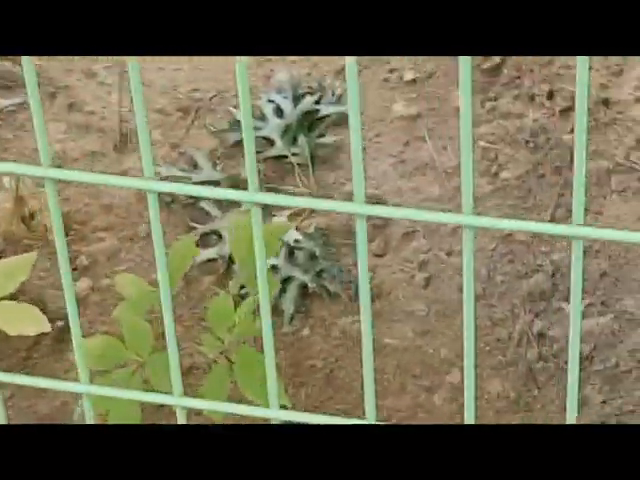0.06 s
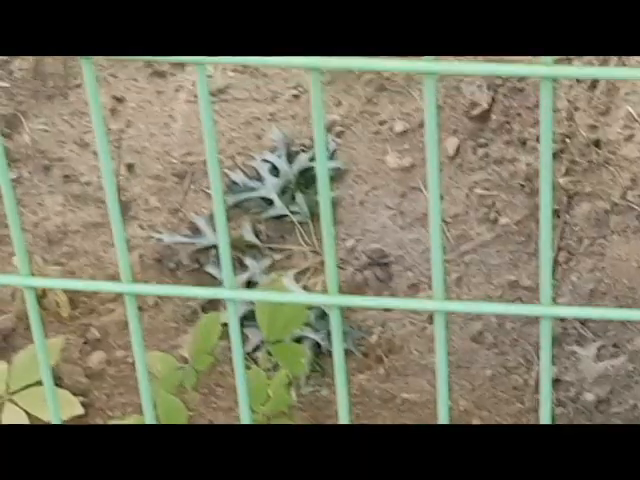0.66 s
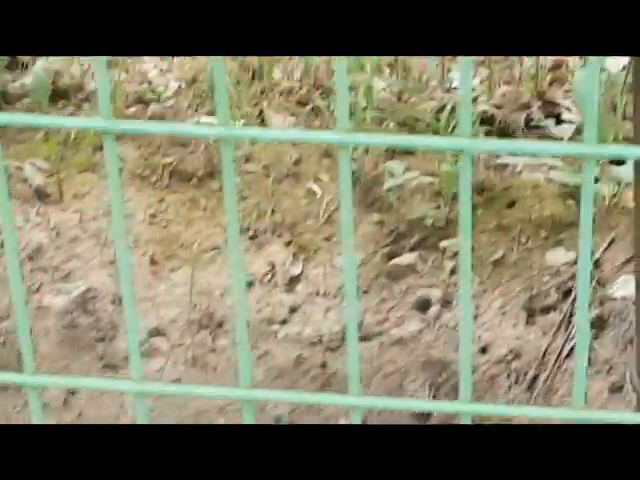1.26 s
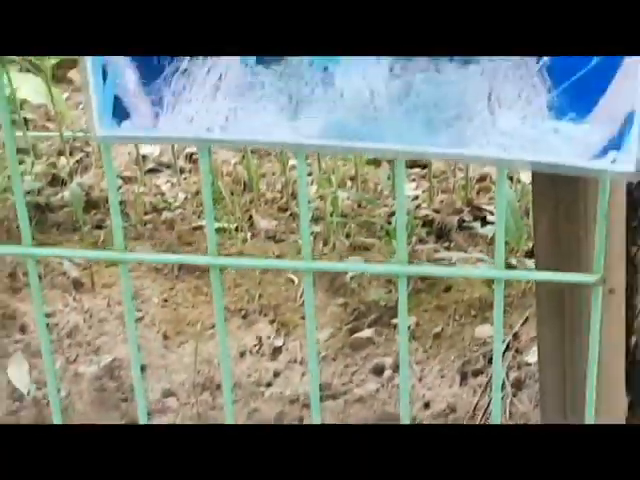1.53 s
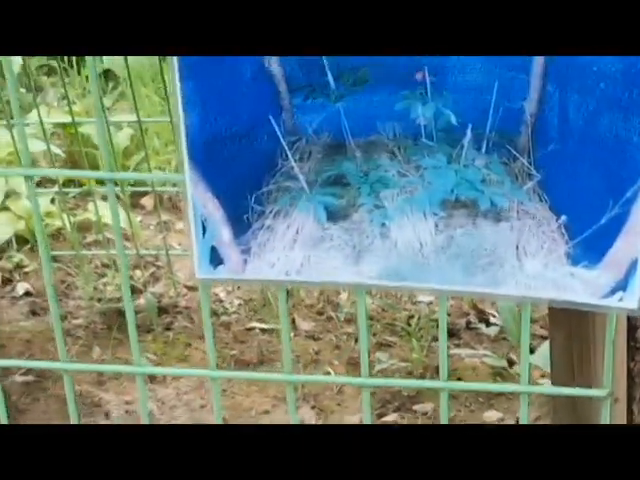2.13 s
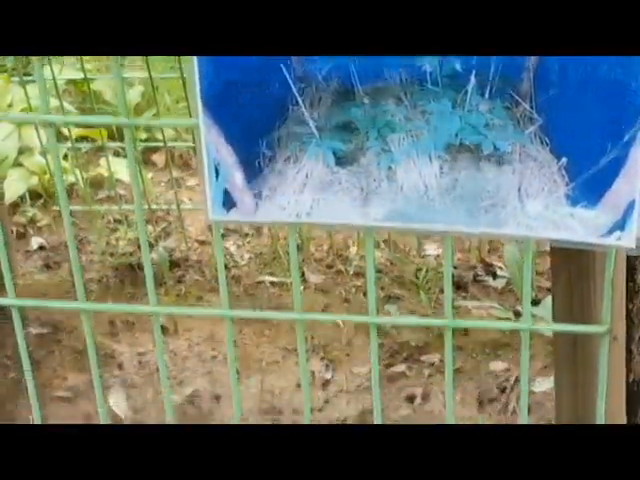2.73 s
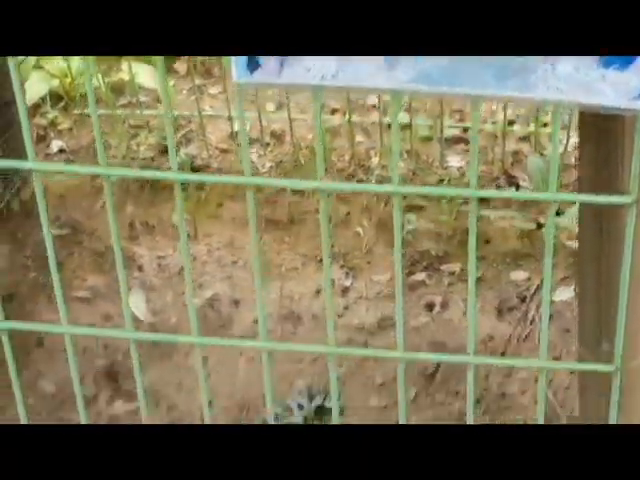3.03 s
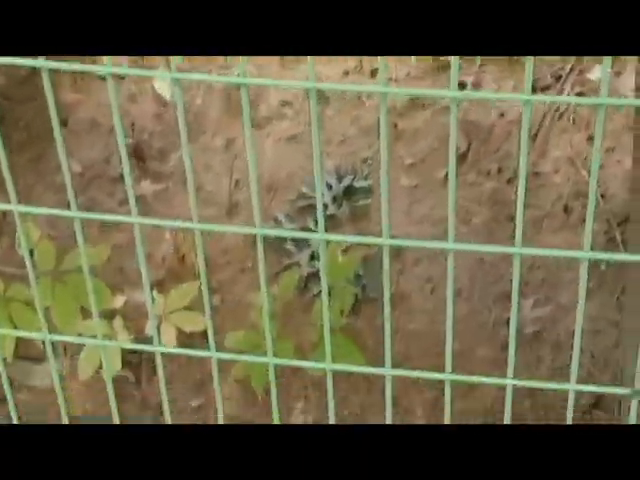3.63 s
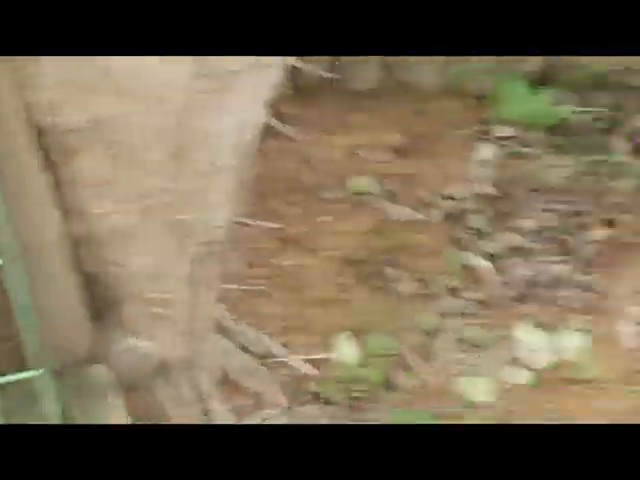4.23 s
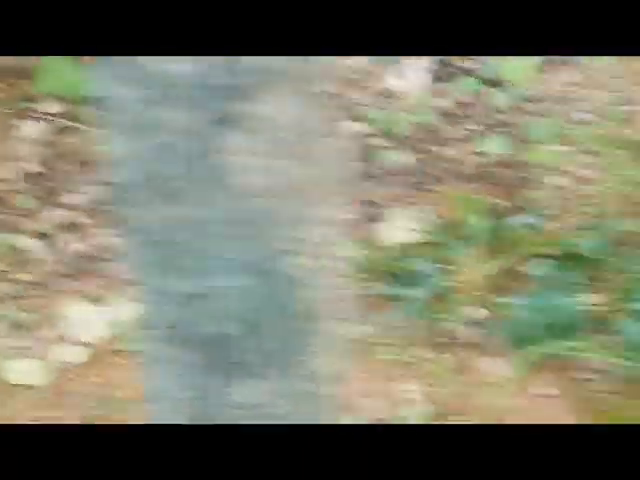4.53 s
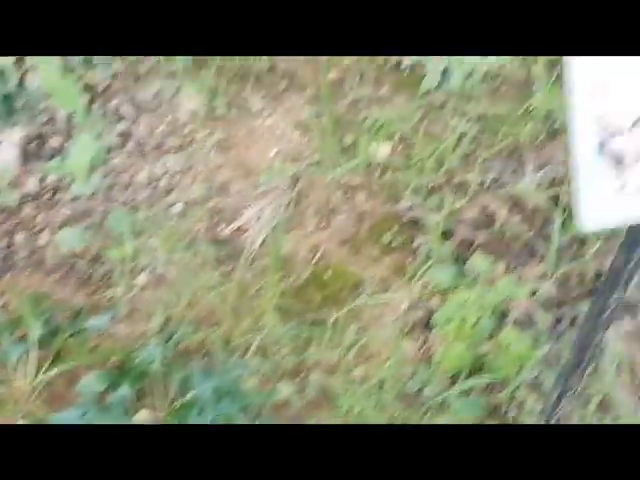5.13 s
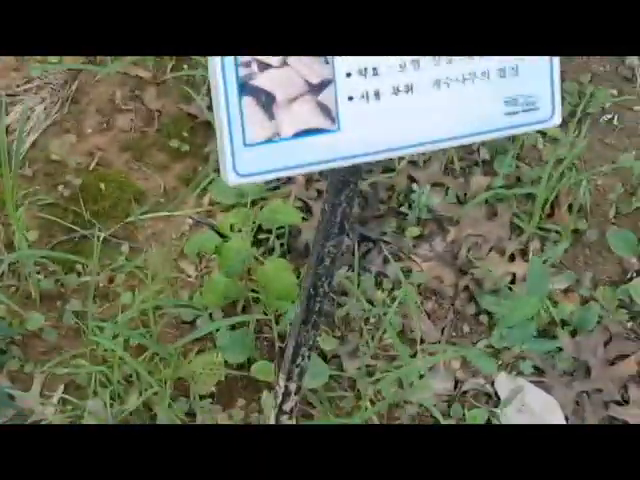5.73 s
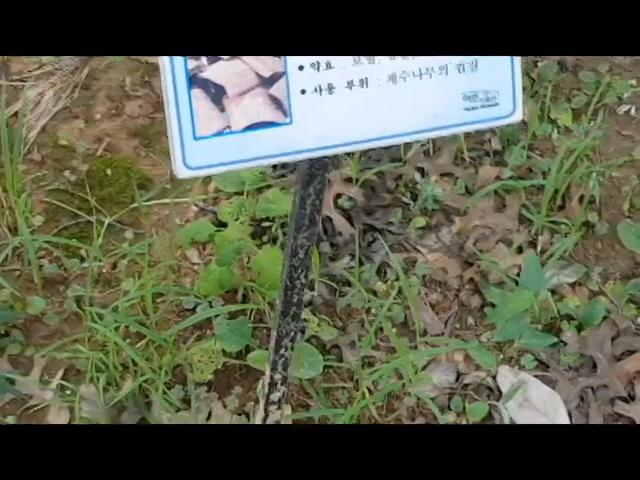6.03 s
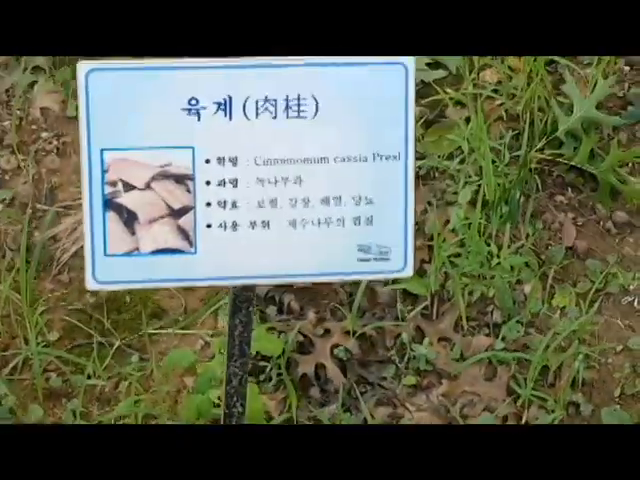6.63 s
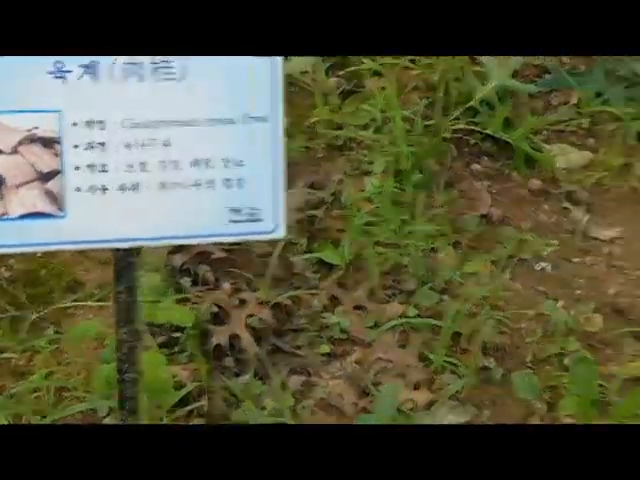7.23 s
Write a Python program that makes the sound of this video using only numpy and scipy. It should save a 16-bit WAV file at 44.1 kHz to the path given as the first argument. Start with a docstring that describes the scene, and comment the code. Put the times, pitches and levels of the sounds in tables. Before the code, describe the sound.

A high, unbroken cicada chorus sizzles outdoors, pulsing about twice a second, with a faint town rumble and machine hum underneath.

```python
"""Cicadas in the trees round a summer garden, each clicking a pair of buckling drums (tymbals).
A far chorus merges into a sizzle through the leaves. Two near singers, one after the other, alternate
a very high rasp (abdomen tight) with a lower ringing note (abdomen stretched), about twice a second.
Under them: town rumble, a faint wavering machine hum, a few soft steps and scuffs on soil.
The hand-held microphone turns away after four seconds."""
import sys
import numpy as np
from scipy import signal
from scipy.fft import rfft, irfft
from scipy.io import wavfile
from scipy.ndimage import uniform_filter1d, map_coordinates

SR = 44100
rng = np.random.default_rng(int(sys.argv[2]) if len(sys.argv) > 2 else 0)


def materialize(psi):
    """Save the field psi as 16-bit PCM at rate SR to the path in sys.argv[1].

    A 1-D psi becomes a single channel; in a 2-D psi each row is a channel.
    """
    bounded = np.clip(np.atleast_2d(psi).T, -1, 1)
    quanta = np.round(bounded * 32767).astype(np.int16)
    wavfile.write(sys.argv[1], SR, quanta)


N = 325017
T = np.arange(N) / SR
BINS_HZ = np.maximum(np.arange(N // 2 + 1) * SR / N, 1)


def undb(db):
    """Decibels to gain."""
    return 10 ** (np.asarray(db) / 20)


def curve(rows, column=1):
    """Table column, interpolated over time."""
    rows = np.array(rows)
    return np.interp(T, rows[:, 0], rows[:, column])


def bell(t_s, sigma_s):
    """Gaussian envelope, peak 1 at t_s."""
    return np.exp(-0.5 * ((T - t_s) / sigma_s) ** 2)


def spectrum(points):
    """Table values, interpolated over log frequency."""
    hz, value = np.transpose(points)
    return np.interp(np.log(BINS_HZ), np.log(hz), value)


def filtered(x, gain):
    """Apply a gain per frequency."""
    return irfft(rfft(x) * gain, N)


def noise(gain, shape=N):
    """White noise shaped by a gain per frequency."""
    return filtered(rng.standard_normal(shape), gain)


def resonance(hz, stage_width_hz):
    """Two equal band-pass stages, for steep skirts."""
    return (1 + 1j * (BINS_HZ ** 2 - hz ** 2) / (BINS_HZ * stage_width_hz)) ** -2


def pan(side_db):
    """Stereo gains for a left-minus-right level."""
    return undb(np.array([[0.5], [-0.5]]) * side_db)


def unit(x):
    """Scale to rms 1 in the channel mean."""
    return x / np.std(x.mean(axis=0))


def wander(cutoff_hz):
    """Smooth random drift, rms 1."""
    drift = noise(1 / (1 + (BINS_HZ / cutoff_hz) ** 4))
    return drift / drift.std()


def delayed(x, delay_s):
    """Moving delay on one channel."""
    return map_coordinates(x, [np.arange(N) - delay_s * SR], order=5, mode="nearest")


def tymbals(rate_hz, jitter_cycles, scatter_db, partner_gain=0.94, lag_cycles=0.5):
    """Two drums buckle in turn, each once a cycle; every click has its own size and timing."""
    phase_cycles = np.cumsum(rate_hz) / SR
    cycle = np.arange(int(phase_cycles[-1]))[:, None]
    click_cycles = cycle + np.array([0, lag_cycles])
    click_cycles += jitter_cycles * rng.standard_normal(click_cycles.shape)
    size = np.array([1, partner_gain]) * undb(scatter_db * rng.standard_normal(click_cycles.shape))
    at_sample = np.interp(click_cycles.ravel(), phase_cycles, np.arange(N))[:, None]
    taps = np.floor(at_sample).astype(int) + np.arange(-5, 7)
    offset = taps - at_sample
    clicks = size.reshape(-1, 1) * np.sinc(offset) * np.sinc(offset / 7)  # band-limited impulses
    return np.bincount(taps.ravel() % N, clicks.ravel(), N)


def foliage(x, t60_s, direct_gain, hop=6000):
    """Leaves scatter sound differently to each side; the moving microphone meets new paths each hop."""
    span = 2 * hop
    decay = undb(-60 * T[:span] / t60_s)
    window = np.sin(np.pi * np.arange(span) / span)
    padded = np.pad(x, (hop, span), mode="reflect")
    out = np.zeros((2, N + 5 * hop))
    for start in range(0, N + hop, hop):
        echoes = rng.standard_normal((2, span)) * decay
        echoes /= np.linalg.norm(echoes, axis=1, keepdims=True)
        scattered = signal.fftconvolve([window * padded[start:start + span]], echoes, axes=1)
        out[:, start:start + scattered.shape[1]] += scattered
    return direct_gain * x + out[:, hop:hop + N]


def far_cicadas(count=9):
    """Tymbal pairs, each drifting in rate and level on its own."""
    out = 0
    for rate_hz in np.geomspace(120, 270, count):
        clicks = tymbals(rate_hz * (1 + 0.025 * wander(3)), jitter_cycles=0.01787, scatter_db=3.0)
        out += clicks / clicks.std() * undb(0.87 * wander(27))
    return out


# Chorus spectra, lower body and bright top: f/Hz, relative density/dB
BODY_SPECTRUM_DB = [(1500, -43.5), (2200, -20), (2800, -10), (3200, -6.5), (3550, -2.5), (3950, -1.3),
                    (4300, -2.5), (4900, -1), (5500, -10.5), (6500, -19), (9000, -54)]
BRIGHT_SPECTRUM_DB = [(3500, -29.5), (5000, -16), (5700, -3), (6200, -1), (6900, -2.5), (7500, -5.5),
                      (8500, -10), (10000, -14.5), (11500, -13), (13500, -8), (16000, -8.5)]
# Envelopes of the two bands: t/s, relative level/dB
BODY_LEVEL_DB = [(0, -29), (1.2, -29), (2.4, -29), (3.7, -28.5), (4.3, -31), (5.1, -30), (6, -31),
                 (7.37, -29.5)]
BRIGHT_LEVEL_DB = [(0.0, -28.5), (3.47, -28.5), (4.93, -30), (5.17, -32), (7.2, -33.5)]
# Balance, trees to the left: f/Hz, left minus right/dB
CHORUS_SIDE_DB = [(2000, 6.5), (3000, 3), (3700, 7), (4600, 2), (5500, 6.5), (6800, 10), (8000, 7.5),
                  (10000, 3), (14000, -0.5)]

def chorus():
    """Two groups of trees full of cicadas, heard almost only through the leaves."""
    sizzle = foliage(far_cicadas(), t60_s=0.2, direct_gain=0.078)
    sizzle += foliage(far_cicadas(), t60_s=0.16, direct_gain=0.1)
    side = pan(spectrum(CHORUS_SIDE_DB))
    body = unit(filtered(sizzle, side * undb(spectrum(BODY_SPECTRUM_DB))))
    body *= undb(curve(BODY_LEVEL_DB) + 0.32 * wander(23))
    bright = unit(filtered(sizzle, side * undb(spectrum(BRIGHT_SPECTRUM_DB))))
    bright *= undb(curve(BRIGHT_LEVEL_DB) + 0.7 + 0.12 * wander(25))
    return body + bright


def rasp(levels_db, rates_hz, spectrum_db, gain_db, side_db, jitter_cycles, direct_gain):
    """Near cicada, abdomen tight: only the stiff tymbal ribs ring, very high."""
    rate_hz = curve(rates_hz) * (1 + 0.0015 * wander(8))
    clicks = tymbals(rate_hz, jitter_cycles, scatter_db=2.5, partner_gain=0.71, lag_cycles=0.485)
    rib_decay_s = 0.00049  # each buckling runs across several ribs
    bursts = signal.lfilter([1], [1, -np.exp(-1 / (rib_decay_s * SR))], np.abs(clicks))
    ribs = bursts * rng.standard_normal(N)
    voice = clicks / clicks.std() + 0.76 * ribs / ribs.std()
    scattered = foliage(voice, t60_s=0.3, direct_gain=direct_gain)
    heard = unit(filtered(scattered, undb(spectrum(spectrum_db)) * pan(side_db)))
    singing = (T >= levels_db[0][0]) & (T <= levels_db[-1][0] + 0.01)
    gate = uniform_filter1d(singing.astype(float), SR // 10)
    return heard * gate * undb(curve(levels_db) + rasp_dips_db() + gain_db)


# Rasp envelopes, louder as the microphone faces the singer: t/s, relative level/dB
FIRST_LEVEL_DB = [(0, -30), (.6, -32.5), (1.5, -32), (2.0, -30.5), (2.4, -31), (2.9, -29), (3.35, -31.5),
                  (4.0, -31)]
SECOND_LEVEL_DB = [(4.0, -31), (4.3, -42), (4.92, -42), (5.25, -31.5), (5.7, -30), (6.1, -27.8),
                   (6.55, -25.5), (7.0, -26.3), (7.37, -26)]
# Buckling rate of each tymbal: t/s, rate/Hz
FIRST_RATE_HZ = [(0, 154), (.6, 146), (1.5, 160), (2.5, 161), (3.4, 180), (4.2, 155)]
SECOND_RATE_HZ = [(4.1, 186), (5.2, 188.4), (6.1, 185.7), (6.5, 186.6), (7.37, 187.5)]
# Rib spectra: f/Hz, relative density/dB
FIRST_SPECTRUM_DB = [(7000, -49), (10500, -15.5), (12000, -6), (13000, 0), (14000, 1.5), (15800, -1.5)]
SECOND_SPECTRUM_DB = [(7000, -28), (10500, -24), (12000, -13), (13000, -1), (13900, 2.5), (15000, 2),
                      (15800, 0.5)]

def near_rasps():
    """Two near cicadas; the second takes over at 4 s."""
    first = rasp(FIRST_LEVEL_DB, FIRST_RATE_HZ, FIRST_SPECTRUM_DB,
                 gain_db=3.0, side_db=2.0, jitter_cycles=0.0128, direct_gain=0.26)
    second = rasp(SECOND_LEVEL_DB, SECOND_RATE_HZ, SECOND_SPECTRUM_DB,
                  gain_db=0.9, side_db=5.0, jitter_cycles=0.0026, direct_gain=0.25)
    return first + second


# Traffic spectrum: f/Hz, relative density/dB
TOWN_SPECTRUM_DB = [(20, -20), (35, -10), (52, -2), (90, -6.5), (240, -2), (320, -3), (460, -9), (640, -8),
                    (900, -10.5), (1350, -9), (1900, -15.5), (3000, -38), (8000, -38)]
# Likeness of left and right: f/Hz, coherence/0-1
TOWN_COHERENCE = [(30, 1), (130, 0.94), (300, 0.97), (600, 0.92), (1100, 0.19), (2000, 0.22)]
# Balance of traffic and hum: f/Hz, left minus right/dB
TOWN_SIDE_DB = [(40, -1.5), (250, 0.1), (600, 0.5), (1200, 4), (2500, 5)]
# Traffic envelope: t/s, level/dB
TOWN_LEVEL_DB = [(0, -39.5), (2.5, -38.5), (4.2, -39.5), (5.5, -40), (7.37, -38.5)]
# Microphone pose: t/s, ground bounce delay/s, left port lag/s
POSE_DELAYS_S = [(0, 0.001, .00033), (2.5, 0.0012, .00032), (3.3, 0.00095, .00034), (3.9, 0.00081, .00034),
                 (4.5, 0.00089, -.00003), (5.2, 0.0013, -.00004), (7.37, .0012, 0)]

def town():
    """Far traffic: bass alike on both sides; the ground bounce hollows out the low middle."""
    coherence = np.clip(spectrum(TOWN_COHERENCE), 0, 1)
    mid = noise(np.sqrt(1 + coherence))
    side = noise(np.sqrt(1 - coherence))
    colour = undb(spectrum(TOWN_SPECTRUM_DB)) * pan(spectrum(TOWN_SIDE_DB))
    direct = filtered(np.array([mid + side, mid - side]), colour)
    reflected = filtered(direct, 0.46 / (1 + (BINS_HZ / 900) ** 2))
    bounce = np.array([delayed(channel, curve(POSE_DELAYS_S)) for channel in reflected])
    return unit(direct + bounce) * undb(curve(TOWN_LEVEL_DB) + 0.25 * wander(1.0))


def port_lag(background):
    """Above the all-round bass, sound reaches the left port late until the microphone turns."""
    left, right = background
    bass = filtered(left, 1 / (1 + (BINS_HZ / 420) ** 4))
    upper = delayed(left - bass, curve(POSE_DELAYS_S, column=2))
    return np.array([bass + upper, right])


# Machine tones: f/Hz, half-power width/Hz, level/dB
HUM_TONES = [(112.8, 7.8, -50.5), (172.2, 7.8, -54.5), (231.5, 7.7, -50), (703, 12, -51.5),
             (1395, 29, -55.5)]

def machine_hum():
    """Narrow tones of a far machine, wavering as the air carries them."""
    side = pan(spectrum(TOWN_SIDE_DB))
    return sum(unit(noise(resonance(hz, 1.57 * width_hz) * side)) * undb(level_db)
               for hz, width_hz, level_db in HUM_TONES)


def tilt_gain_db(hz, tilt_db, pivot_hz=4430):
    """Positive tilt favours resonances above the pivot, negative those below."""
    return tilt_db * np.tanh(4 * np.log2(hz / pivot_hz))


# Notes between rasps: t/s, sigma/s, relative level/dB, click rate of the pair/Hz, rasp dip/dB, tilt/dB
NOTE_EVENTS = [(.35, 0.058, -29, 378.3, 1, 4), (.48, 0.055, -29, 399, 0, -7),
               (.67, 0.1, -26.5, 395.4, 6, -2), (1.1, 0.13, -29.5, 384, 0, -6),
               (1.65, .08, -26.5, 394.6, 1, -5), (2.14, 0.085, -24, 391, 5, -5),
               (2.6, 0.078, -24, 388, 3.5, -2), (3.11, 0.1, -25.5, 399.5, 6, -1),
               (3.62, 0.094, -25.5, 394, 9, -2), (4.04, 0.036, -29.5, 380.4, 3, -4),
               (4.24, 0.046, -28.5, 395, 3, -7), (4.39, 0.055, -28.5, 396, 4, 2),
               (4.68, 0.017, -26.5, 389, 2, -6.5), (4.88, 0.048, -28.5, 378, 2, 0),
               (5.41, 0.086, -39, 380, 1, 7), (5.84, 0.087, -28, 390, 4, 0),
               (6.26, .06, -26.5, 378, 9, -3.5), (6.71, 0.065, -25, 375, 7, -4),
               (7.17, 0.065, -26.5, 374.5, 5.5, -4)]
# Abdomen resonances: f/Hz, stage width/Hz, relative level/dB, swell delay/s
ABDOMEN_MODES = [(3860, 1200, -2, -0.023), (4535, 980, -1, 0.031), (5000, 620, 0.5, 0.0083),
                 (6600, 770, -5, 0.015)]

def abdomen_notes():
    """The stretched abdomen rings with the clicks; its lowest resonance swells first."""
    tymbal_hz = curve(NOTE_EVENTS, column=3) / 2 * (1 + 0.004 * wander(9.98))
    clicks = tymbals(tymbal_hz, jitter_cycles=0.021, scatter_db=0.5, partner_gain=0.56)
    scattered = foliage(clicks, t60_s=0.17, direct_gain=0.75)
    out = 0
    for hz, width_hz, mode_db, delay_s in ABDOMEN_MODES:
        ringing = unit(filtered(scattered, resonance(hz, width_hz) * pan(5.5)))
        swell = sum(undb(note_db + tilt_gain_db(hz, tilt_db)) * bell(t_s + delay_s, sigma_s)
                    for t_s, sigma_s, note_db, _, _, tilt_db in NOTE_EVENTS)
        out += ringing * swell * undb(mode_db - 7.5)
    return out


def whistles(gain_db=-3.5, scatter_db=0.5, sigma_s=0.039):
    """In each note, the click harmonic nearest each resonance rings out briefly, fluttering."""
    out = np.zeros((2, N))
    drifting_s = T + np.cumsum(0.00484 * wander(71)) / SR
    for t_s, _, note_db, click_hz, _, tilt_db in NOTE_EVENTS:
        for hz, _, mode_db, delay_s in ABDOMEN_MODES:
            age_sigmas = (T - t_s - delay_s) / sigma_s
            active = np.abs(age_sigmas) < 4
            harmonic_hz = np.round(hz / click_hz) * click_hz
            phase = 2 * np.pi * (harmonic_hz * drifting_s[active] + rng.random((2, 1)))
            level_db = note_db + mode_db + tilt_gain_db(hz, tilt_db) + gain_db
            level_db -= scatter_db * rng.standard_normal()
            out[:, active] += undb(level_db) * np.exp(-0.5 * age_sigmas[active] ** 2) * np.sin(phase)
    flutter = undb(2 * np.array([wander(60), wander(60)]))
    return out * flutter * pan(6.0)


def rasp_dips_db(lag_s=0.015, fall_sigmas=0.9, recover_sigmas=1.24):
    """The rasp drops quickly as the abdomen stretches for a note, then swells back as it tightens."""
    out = 0
    for t_s, sigma_s, _, _, dip_db, _ in NOTE_EVENTS:
        age_sigmas = (T - t_s - lag_s) / sigma_s
        fall = (age_sigmas / fall_sigmas) ** 4
        recovery = (age_sigmas / recover_sigmas) ** 2
        out -= dip_db * np.exp(-np.where(age_sigmas < 0, fall, recovery))
    return out


# Footfalls during the turn: t/s, sigma/s, level/dB
STEP_EVENTS = [(4.503, 0.079, -40.5), (5.08, 0.17, -42)]

def steps():
    """Slow, padded footfalls on soil: dull bass, the same on both sides."""
    thud = unit(noise(resonance(hz=110, stage_width_hz=187), shape=(1, N)))
    return thud * sum(undb(level_db) * bell(t_s, sigma_s) for t_s, sigma_s, level_db in STEP_EVENTS)


# Scuffs: t/s, sigma/s, level/dB, f/Hz
SCUFF_EVENTS = [(4.633, .005, -44, 1420), (6.102, 0.0037, -30, 1750)]

def scuffs():
    """Short, dull scrapes of dry soil."""
    out = 0
    for t_s, sigma_s, level_db, hz in SCUFF_EVENTS:
        scrape = unit(noise(resonance(hz, stage_width_hz=1900) * pan(5.1), shape=(2, N)))
        out += scrape * undb(level_db) * bell(t_s, sigma_s)
    return out


def scene():
    """Cicadas over the quiet background."""
    cicadas = near_rasps() + chorus() + abdomen_notes() + whistles()
    background = port_lag(town() + machine_hum())
    return cicadas + background + steps() + scuffs()


def record(dry, cutoff_hz=15750):
    """The microphone cuts the top steeply."""
    return filtered(dry, 1 / np.sqrt(1 + np.minimum(BINS_HZ / cutoff_hz, 1.1) ** 500))


dry = scene()
out = record(dry)
materialize(out)
```